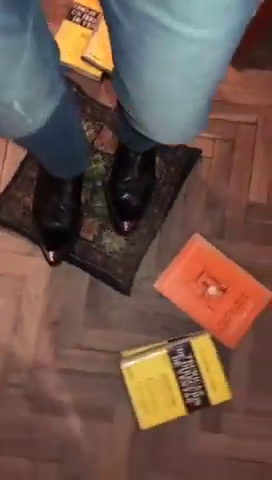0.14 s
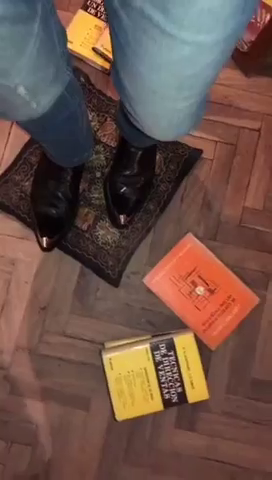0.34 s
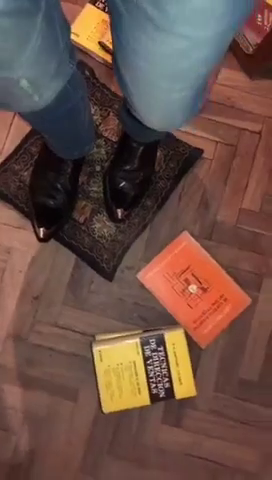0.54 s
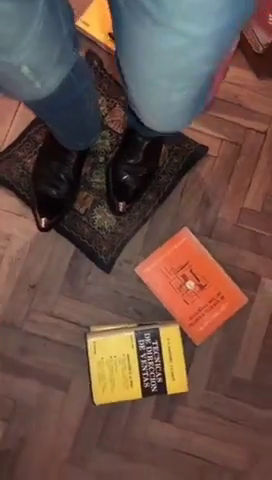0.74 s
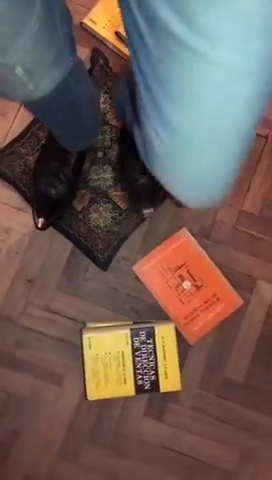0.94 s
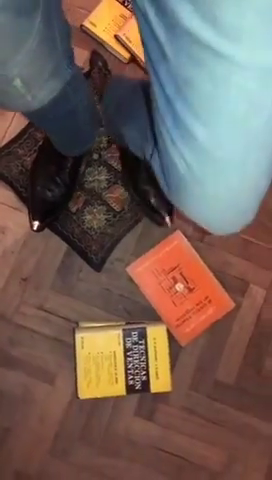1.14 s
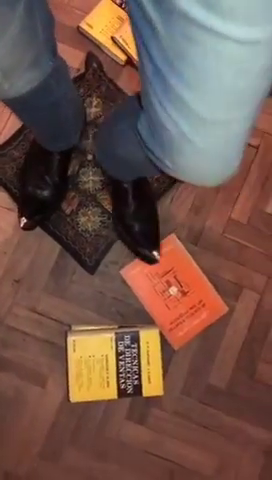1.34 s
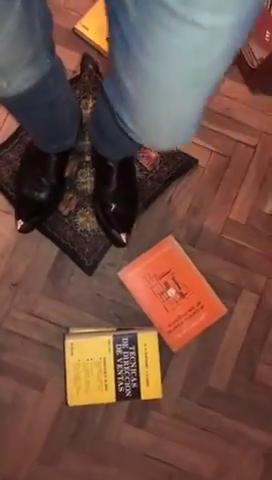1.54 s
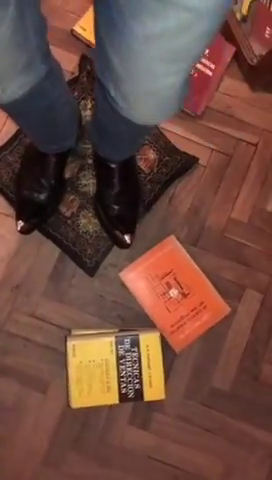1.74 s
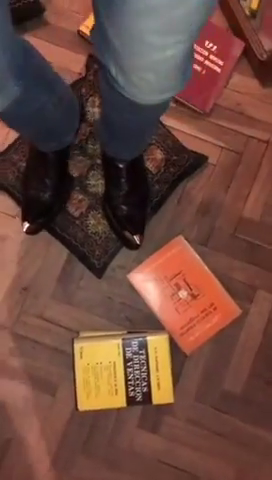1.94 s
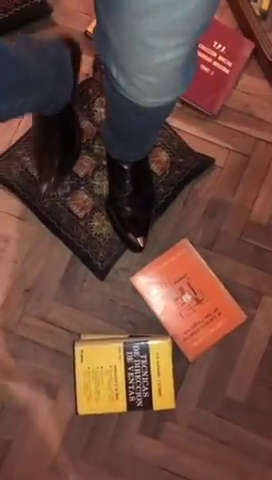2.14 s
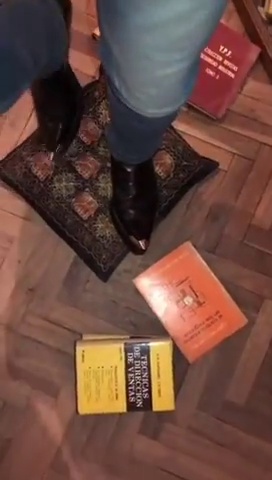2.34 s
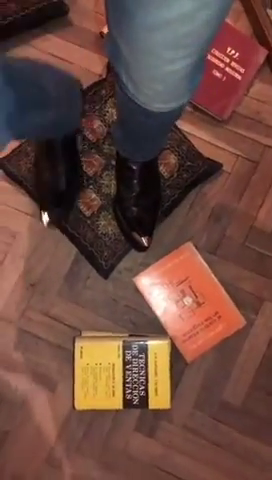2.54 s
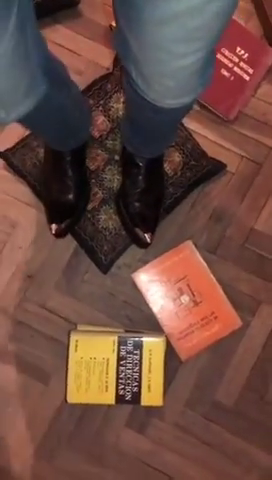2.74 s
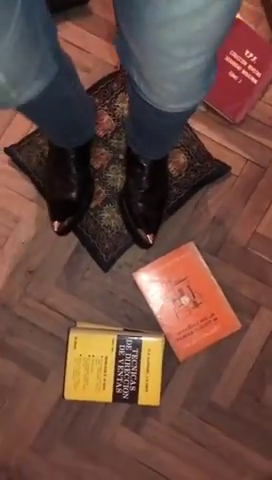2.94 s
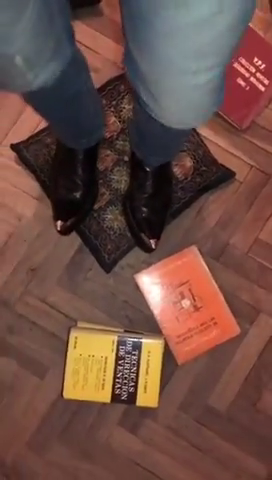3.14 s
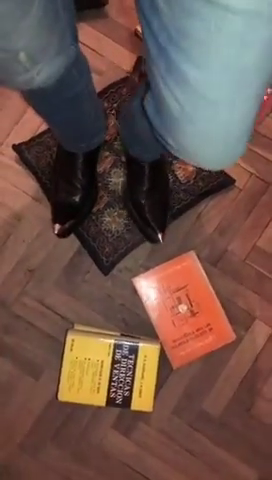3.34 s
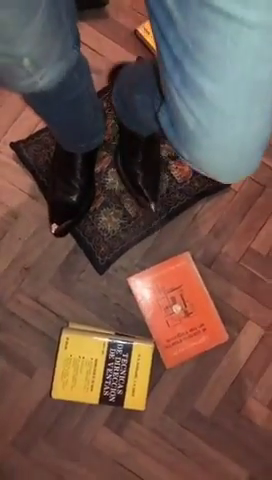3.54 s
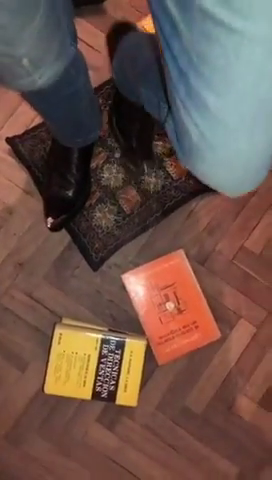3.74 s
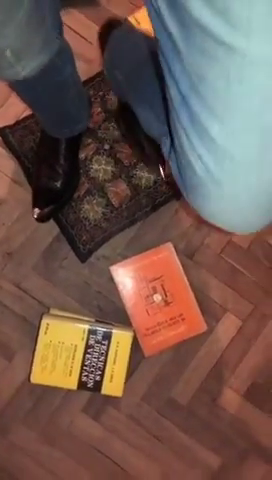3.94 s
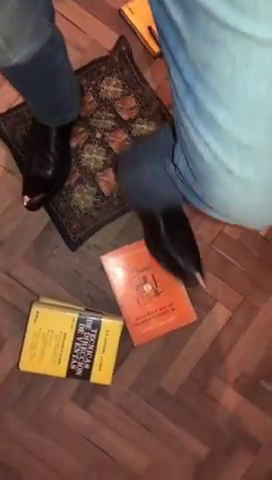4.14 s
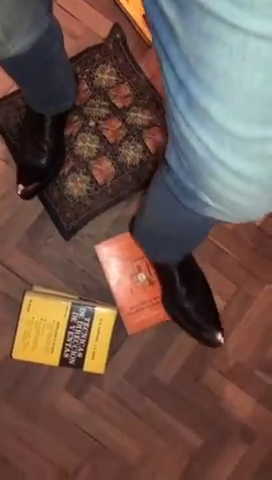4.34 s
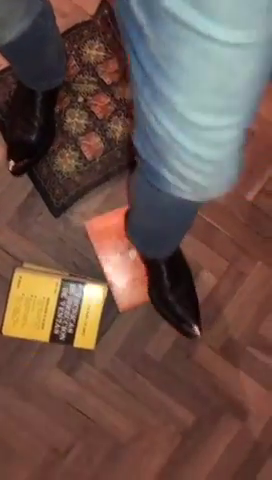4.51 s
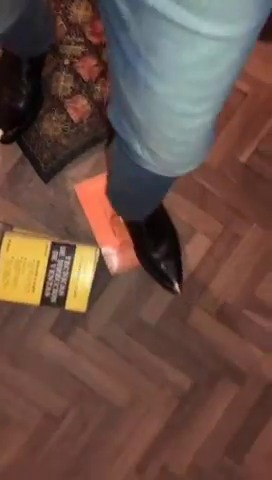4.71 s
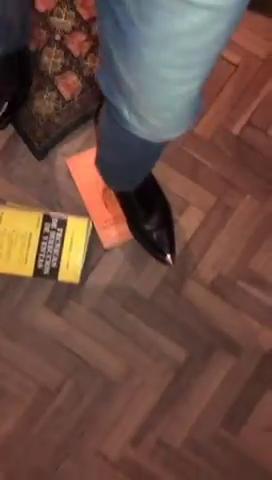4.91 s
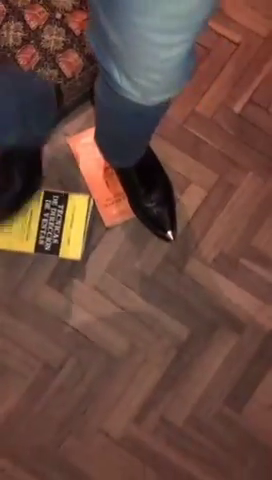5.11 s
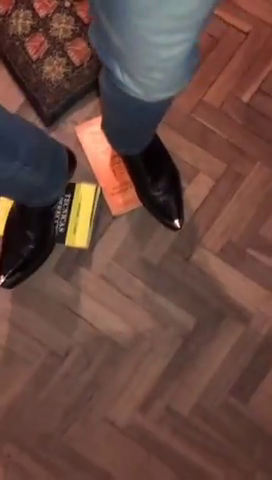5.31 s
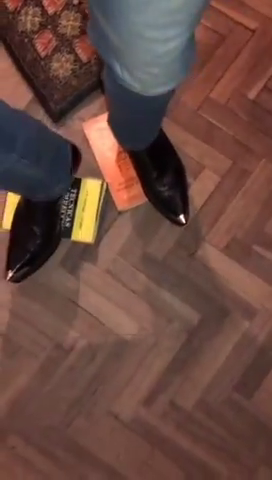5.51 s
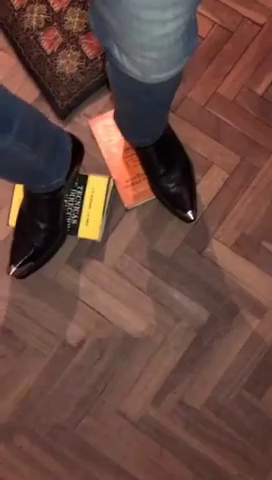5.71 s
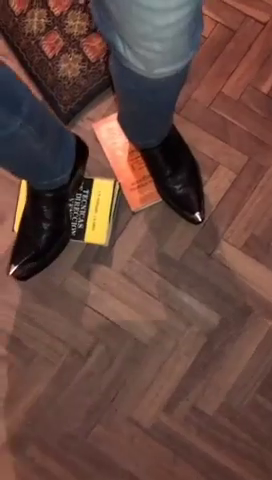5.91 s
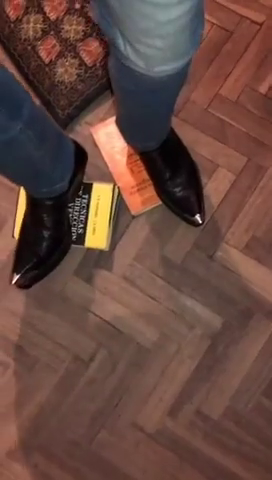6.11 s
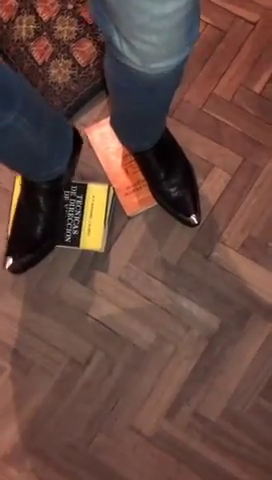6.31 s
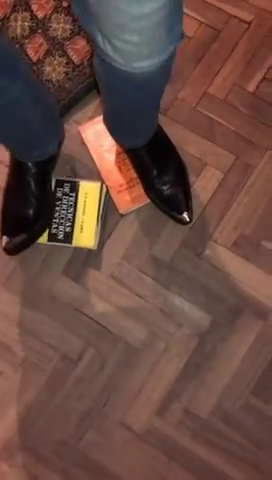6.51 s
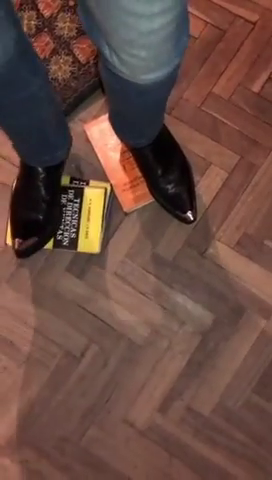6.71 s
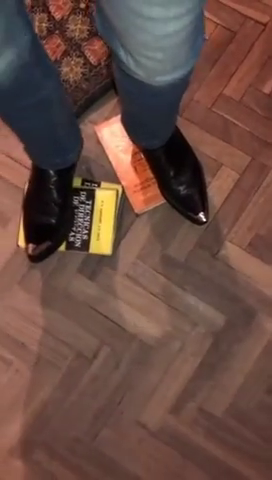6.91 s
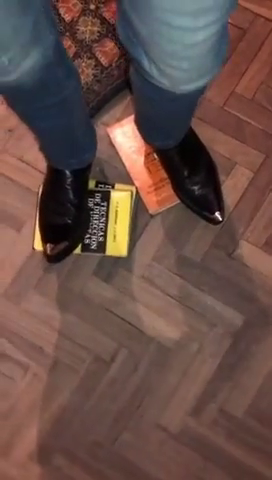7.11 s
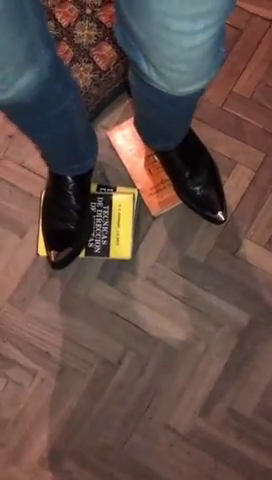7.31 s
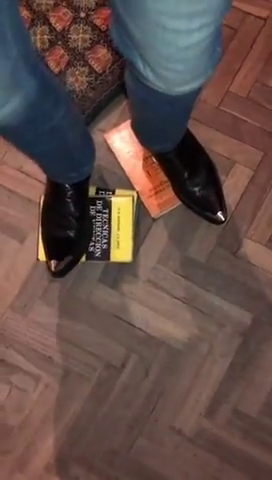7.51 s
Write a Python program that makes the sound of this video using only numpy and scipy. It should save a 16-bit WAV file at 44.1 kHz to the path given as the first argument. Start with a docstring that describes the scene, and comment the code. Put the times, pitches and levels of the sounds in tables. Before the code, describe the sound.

Close cloth swishes come and go as someone in hard-soled boots shifts on a cushion, with two or three soft heel bumps. Then a sharp knock as a boot steps on a book on parquet, a heavier double clack, and a last lighter knock with a gritty sole skid. Faint ticks and a small leather creak follow. Small lively room, quiet hum and hiss, handheld microphone above.

```python
"""Someone in hard-soled boots first shifts about on a cushion: filtered noise makes denim and embroidered
cloth swish at each move, and a heel gives soft bumps. Then come three knocks, as the boots step onto two books
on a parquet floor: decaying sine waves ring the boards in a small room, and noise bursts slap the covers.
After the second knock a sole skids with a gritty hiss, and near the end the leather creaks in quick slips.
Small ticks are scattered along the way; a faint hum, whine and hiss of air lie underneath throughout."""
import sys
import numpy as np
from scipy import signal
from scipy.fft import irfft, next_fast_len
from scipy.io import wavfile

SR = 44100
rng = np.random.default_rng(int(sys.argv[2]) if len(sys.argv) > 2 else 0)


def pcm_store(signal):
    """Save signal as 16-bit PCM."""
    levels = np.round(np.clip(np.atleast_2d(signal), -1, 1) * 32767)
    wavfile.write(sys.argv[1], SR, levels.astype(np.int16).T)


N = 337806
TIME = np.arange(N) / SR


def from_db(db):
    """Turn decibels into a gain."""
    return 10 ** (np.asarray(db) / 20)


def rms_one(x):
    """Scale to an average strength (rms) of 1."""
    return x / np.sqrt(np.mean(x ** 2) + 1e-20)


def at_hz(points, hz):
    """Read a table between its rows, on a log-frequency axis."""
    f, value = np.transpose(points)
    return np.interp(np.log(np.maximum(hz, 1)), np.log(f), value)


def noise(spectrum, size, tilt=0):
    """Noise with a given spectrum, tilted in dB per octave; rms 1."""
    hz = np.fft.rfftfreq(size, 1 / SR)
    lowest_hz = spectrum[0][0]
    octaves = np.log2(np.maximum(hz, lowest_hz))
    # below the first row of the table the noise fades out
    fade = np.minimum(hz / lowest_hz, 1) ** 2
    gain = from_db(at_hz(spectrum, hz) + tilt * octaves) * fade
    random_phase = np.exp(2j * np.pi * rng.random(len(hz)))
    return rms_one(irfft(gain * random_phase, size))


def long_noise(spectrum):
    """Noise with a given spectrum that lasts the whole scene."""
    return noise(spectrum, size=next_fast_len(N))[:N]


def band(x, low_hz, high_hz, order=2):
    """Keep only what lies between two frequencies (Butterworth band-pass)."""
    edges = [low_hz, min(high_hz, SR / 2 - 1)]
    return signal.sosfilt(signal.butter(order, edges, "band", fs=SR, output="sos"), x)


def resonance(x, hz, width):
    """Two-pole resonance, gain 1 on top."""
    r = np.exp(-np.pi * width / SR)
    feedback = [1, -2 * r * np.cos(2 * np.pi * hz / SR), r * r]
    return signal.lfilter(np.array([1, 0, -1]) * (1 - r * r) / 2, feedback, x)


def decay(t, t60):
    """Falls by 60 dB in t60 seconds."""
    return np.exp(-np.log(1000) * t / t60)


def add(out, s, sound):
    """Mix a sound in at time s."""
    start = round(s * SR)
    out[start:start + len(sound)] += sound[:N - start]


def ringing(modes, alternate=False):
    """One second of a body's answer to a unit blow; neighbouring modes may swing in opposite senses."""
    t, out = TIME[:SR], 0
    sense = -1 if alternate else 1
    for k, (hz, db, t60) in enumerate(modes):
        out = out + sense ** k * from_db(db) * decay(t, t60) * np.sin(2 * np.pi * hz * t)
    return out


def push(x, contact_ms):
    """A contact of finite length cannot excite modes much faster than itself."""
    r = np.exp(-2 * np.pi * 1000 / (contact_ms * SR))
    return signal.lfilter([(1 - r) ** 2], [1, -2 * r, r * r], x)


STROKE_RANGE_DB = 23  # rise and fall times span this much


def stroke(s, rise_s, hold_s, fall_s):
    """Gain of a rubbing stroke: it gathers speed, holds from time s, and dies away."""
    before = np.maximum(s - TIME, 0) / rise_s
    after = np.maximum(TIME - s - hold_s, 0) / fall_s
    return from_db(-STROKE_RANGE_DB * np.minimum(before + after, 10))


def catching(depth_db, rate_hz):
    """Rubbing surfaces catch and let go: a fast uneven gain of rms 1."""
    slow_pass = signal.butter(2, rate_hz, fs=SR, output="sos")
    wander = signal.sosfilt(slow_pass, rng.standard_normal(N))
    return rms_one(from_db(depth_db * rms_one(wander)))


# Deep swaying of the floor and the air above it. Each row: pitch in Hz, level in dB, time to fall 60 dB in s.
FLOOR_SWAY = [(62.15, -10, 0.51), (71.7, -2.5, 0.19), (86, -15.5, 0.59)]
# Book and boards; each step lands on another spot and reaches the modes differently.
# Each row: pitch in Hz, time to fall 60 dB in seconds, then level in dB at step 1, step 2 and step 3.
BOARDS = [(78, 0.22, -29, -11, -6.5), (117.2, 0.41, -13, -9, -19), (140.3, 0.46, -8.5, -14, -6.5),
          (171, 0.24, -21, -3.5, 4.5), (215, 0.25, -16, -3, -4.5), (286, 0.17, -0.5, 3, -11),
          (328, 0.22, -9, -2.5, -8), (403, 0.17, -1.5, -8, -2.5), (488, 0.14, -10, -5, -6),
          (565, 0.034, 0, -22, -7), (626, 0.082, -2, -4.5, -8.5), (695, 0.065, -3.5, 1.5, -10),
          (838, 0.038, -0.5, 1.5, -27), (917, 0.074, -2, 1.5, -4), (1025, 0.051, -21, 4, 3.5),
          (1038, 0.21, -20, -6, -27), (1115, .12, -29, -15, -9), (1340, 0.1, -31, -5.5, -7),
          (1530, 0.075, -30, -8.5, -3.5), (1930, 0.023, -22, -13, 0), (2720, 0.045, 9, -7, -23)]
# Colour of the flat slap of sole on cover. Each row: frequency in Hz, relative level in dB per Hz.
SLAP_COLOUR = [(120, -24), (250, 1), (450, -2.5), (800, -7), (1300, -10), (1900, -13), (2800, -14),
               (4500, -19), (8000, -24), (15500, -34)]
# Heel and sole meeting a book. Each row: start in seconds, thud level in dB, knock level in dB,
# contact time in ms, slap level in dB, slap tilt in dB per octave, time for the slap to fall 60 dB in seconds.
CONTACTS = [(4.6582, -39, -29, 1.3, -30.5, -2, 0.053), (4.6732, -42.5, -64, 2.3, -45, 0, 0.31),
            (4.7, -78, -69, 1.4, -59, 4.5, 0.15), (5.3034, -71, -40.5, 0.18, -29.5, 0, 0.059),
            (5.3085, -67, -34.5, 0.52, -27, -8, 0.041), (5.3136, -26, -29.5, 0.69, -35, 0.0, 0.18),
            (5.3227, -36, -42, 2, -42, -9, 0.077), (5.3267, -24, -39.5, 2.5, -39, -2.5, 0.046),
            (6.5982, -61, -40.5, 0.5, -41, 1.5, 0.015), (6.6066, -36.5, -47, 2, -42.5, -5.5, 0.055),
            (6.648, -32, -41, 1.05, -42, -1.5, 0.041)]
STEP_GAP_S = 0.3  # after a longer pause the next contact is a new step on a new spot


def footfalls(thud_contact_ms=1.6, crack_db=3.5, crack_t60=0.018, slap_rise_s=0.00075, lowest_hz=46):
    """Each contact slaps the cover, knocks the boards beneath and loads the whole floor."""
    out, t = np.zeros(N), TIME[:SR]
    thud = push(ringing(FLOOR_SWAY), thud_contact_ms)
    mode_hz, mode_t60, *spots = np.transpose(BOARDS)
    rows = np.array(CONTACTS)
    new_steps = np.flatnonzero(np.diff(rows[:, 0]) > STEP_GAP_S) + 1
    for contacts, spot_db in zip(np.split(rows, new_steps), spots):
        boards = ringing(zip(mode_hz, spot_db, mode_t60), alternate=True)
        for s, thud_db, knock_db, contact_ms, slap_db, tilt, t60 in contacts:
            knock = push(boards, contact_ms)
            add(out, s, from_db(thud_db) * thud + from_db(knock_db) * knock)
            # the hard edge cracks first, then the pages are pressed flat
            shape = decay(t, t60) + from_db(crack_db) * decay(t, crack_t60)
            shape = shape * (1 - np.exp(-t / slap_rise_s))
            slap = noise(SLAP_COLOUR, size=8192, tilt=tilt)
            add(out, s, from_db(slap_db) * slap * shape[:len(slap)])
    # the floor radiates little at the very bottom
    return signal.sosfilt(signal.butter(3, lowest_hz, "high", fs=SR, output="sos"), out)


# A heel set down on the cushion. Each row: start in seconds, level in dB.
PADS = [(2.088, -43.5), (2.239, -59), (3.812, -42.5)]


def pads(contact_ms=4.3):
    """Through the cushion a heel gives the boards only a long, soft push."""
    out = np.zeros(N)
    mode_hz, mode_t60, *spots = np.transpose(BOARDS)
    mean_db = np.mean(spots, axis=0)
    bump = push(ringing(zip(mode_hz, mean_db, mode_t60), alternate=True), contact_ms)
    for s, db in PADS:
        add(out, s, from_db(db) * bump)
    return out


def shifting(x, patchy_db, rate_hz, top_hz=4600, count=12):
    """Wrinkles form and flatten: each band of the swish swells and fades a little by itself."""
    edges, out = np.geomspace(480, top_hz, count + 1), 0
    for k, (low, high) in enumerate(zip(edges, edges[1:])):
        # alternating signs let neighbouring bands join without a notch
        out = out + (-1) ** k * band(x, low, high) * catching(patchy_db, rate_hz)
    return out


# Colour of rubbing cloth. Each row: frequency in Hz, relative level in dB per Hz.
CLOTH_COLOUR = [(90, -10), (140, 4.5), (205, -1.5), (275, 4.5), (420, -3.5), (760, -8.5), (1100, -7),
                (1600, -11), (2800, -11.5), (4200, -12), (6300, -12.5), (13000, -20), (15800, -23)]
# Cloth rubbing as a leg moves. Each row: time of full speed in seconds, rise, hold and fall in seconds,
# friction level in dB, rumble and fine hiss in dB relative to it, pitch of the fold in Hz, its relative level in dB.
RUBS = [(0.202, 0.17, 0.024, 0.085, -55.5, -4, -4, 525, 3),
        (0.959, 0.087, 0.026, 0.1, -55, -4.5, -4.5, 550, -6),
        (1.509, 0.088, 0.064, 0.077, -52, -2.5, -8, 1140, -9),
        (2.091, 0.092, 0.17, 0.053, -51, -7.5, -5.5, 1170, -2.5),
        (2.629, 0.018, 0.03, 0.044, -55, -4, -5, 880, 1),
        (2.719, 0.064, 0.013, 0.037, -62, -9, -4.5, 1100, -26),
        (3.369, 0.21, 0.097, 0.52, -54.5, -1.5, -6, 1110, -40),
        (3.761, 0.57, 0.046, 0.042, -56.5, -2, -2, 1120, 0),
        (4.176, 0.11, 0.13, .15, -84, -10, 5.5, 1250, -24),
        (4.981, 0.11, 0.0066, 0.034, -59, -6, -4.5, 1290, -20),
        (5.236, 0.58, 0.053, .05, -76.5, -9, 3, 1250, -33)]
# the leg sways faintly round each rub: relative level, and how many times slower it rises and falls
SWAY_DB, SWAY_STRETCH = -25, 5.1
DRAG_LAG_S = 0.015  # the rumble of pressed cloth trails the swish
FOLD_WIDTH = 0.34  # share of the fold's pitch


def cloth(rumble_db=0.0, swish_db=1.0, hiss_db=1.47):
    """Threads slide over each other; pressure adds a rumble, speed a fine hiss, a fold its hollow tone."""
    out, threads = np.zeros(N), long_noise(CLOTH_COLOUR)
    rumble = from_db(rumble_db) * rms_one(band(threads, 113, 520, order=4))
    rumble = rumble * catching(depth_db=1.5, rate_hz=11.4)
    grain = catching(depth_db=0.8, rate_hz=560)
    swish = shifting(long_noise(CLOTH_COLOUR), patchy_db=1.9, rate_hz=15.0) * grain
    hiss = from_db(hiss_db) * rms_one(band(threads, 4460, 17000, order=4)) * grain
    for s, rise, hold, fall, db, pressure_db, speed_db, hz, fold_db in RUBS:
        fold = from_db(fold_db) * resonance(swish, hz, FOLD_WIDTH * hz)
        coloured = from_db(swish_db) * rms_one(swish + fold)
        sway = from_db(SWAY_DB) * stroke(s, SWAY_STRETCH * rise, hold, SWAY_STRETCH * fall)
        speed = np.maximum(stroke(s, rise, hold, fall), sway)
        pressure = stroke(s + DRAG_LAG_S, rise, hold, fall)
        sliding = speed * (coloured + from_db(speed_db) * hiss)
        pressing = pressure * from_db(pressure_db) * rumble
        out += from_db(db) * (sliding + pressing)
    return out


# Colour of a slipping sole's hiss. Each row: frequency in Hz, relative level in dB per Hz.
SKID_COLOUR = [(300, 3), (1000, -3), (2500, -3.5), (4500, -6), (7000, -4), (10000, -12.5), (13000, -11.5),
               (16000, -22)]
# Sole slipping on a cover. Each row: time of full speed in seconds, rise, hold and fall in s, level in dB.
SKIDS = [(5.555, .03, .005, .04, -67.5), (5.635, 0.056, .005, 0.05, -61.5),
         (6.627, 0.028, 0.01, 0.093, -44), (7.603, .06, .05, .06, -71)]


def skid(grit_db=2.0):
    """The sole slips on a glossy cover with a gritty hiss."""
    level = sum(from_db(db) * stroke(s, rise, hold, fall) for s, rise, hold, fall, db in SKIDS)
    return level * long_noise(SKID_COLOUR) * catching(depth_db=grit_db, rate_hz=500)


# Leather creaking as the weight comes onto it. Each row: time of full level in seconds, hold in seconds,
# level in dB, slips per second at first, slips per second at last.
CREAKS = [(7.151, 0.045, -67, 1000, 690), (7.213, 0.036, -61.5, 540, 440)]
# Resonances of the boot. Each row: pitch in Hz, width in Hz, relative level in dB.
LEATHER = [(715, 94, 1), (1000, 250, -10), (1550, 400, -9.5), (2510, 170, -5.5), (2960, 250, -6),
           (3440, 360, -10.5), (4030, 360, -12)]
CREAK_RISE_S, CREAK_FALL_S, CREAK_SLOWING_S = 0.026, 0.031, 0.016
CREAK_JITTER_DB, CREAK_JITTER_HZ = 0.55, 90  # depth and speed of the unevenness in the slip rate


def creak():
    """Leather sticks and slips, ever more slowly and a little unevenly, and rings the boot."""
    out = np.zeros(N)
    for s, hold, db, first_per_s, last_per_s in CREAKS:
        slowing = np.exp(-np.maximum(TIME - s, 0) / CREAK_SLOWING_S)
        per_s = last_per_s + (first_per_s - last_per_s) * slowing
        turns = np.cumsum(per_s * catching(CREAK_JITTER_DB, CREAK_JITTER_HZ)) / SR
        # one click of random strength at each whole turn
        slips = np.diff(np.floor(turns), prepend=0) * rng.uniform(.6, 1, N)
        body = np.zeros(N)
        for k, (hz, width, mode_db) in enumerate(LEATHER):
            body += (-1) ** k * from_db(mode_db) * resonance(slips, hz, width)
        out += from_db(db) * stroke(s, CREAK_RISE_S, hold, CREAK_FALL_S) * rms_one(body)
    return out


# Small ticks of leather and binding.
# Each row: start in seconds, level in dB, centre pitch in Hz, time to fall 60 dB in seconds.
TICKS = [(2.794, -65, 1260, 0.055), (2.932, -64.5, 1140, 0.11), (3.016, -63, 1140, 0.097),
         (3.176, -67, 1500, 0.043), (5.505, -53.5, 3200, 0.021), (5.641, -52.5, 1770, 0.037),
         (6.202, -62, 2470, 0.035), (6.27, -58.5, 6000, 0.047), (7.04, -60, 514, 0.058),
         (7.088, -62, 1470, 0.042), (7.446, -64, 1070, 0.056)]


def ticks(rise_s=0.0017):
    """Short, broad crackles as the weight settles: widely resonant noise that dies away at once."""
    out, t = np.zeros(N), TIME[:SR // 4]
    for s, db, hz, t60 in TICKS:
        crackle = rms_one(resonance(rng.standard_normal(len(t)), hz, hz * 0.63))
        add(out, s, from_db(db) * crackle * decay(t, t60) * (1 - np.exp(-t / rise_s)))
    return out


# How long echoes last. Each row: frequency in Hz, time to fall 60 dB in seconds.
ROOM_T60 = [(100, 0.8), (400, 0.37), (1500, 0.49), (4000, 0.62), (9000, 0.33), (16000, 0.42)]
# How strongly the room answers. Each row: frequency in Hz, relative level in dB.
ROOM_SEND = [(60, -4.5), (200, -1.5), (500, 1), (1500, -4), (5000, -5), (15000, -2)]


def room(x, first_echo_s=0.0033, build_s=0.0085):
    """Dense wall echoes, made of noise that dies away at its own pace in each octave."""
    t, response = TIME[:SR], 0
    onset = 1 - np.exp(-np.maximum(t - first_echo_s, 0) / build_s)
    for hz in 88 * 2. ** np.arange(8):
        tail = rng.standard_normal(SR) * onset * decay(t, at_hz(ROOM_T60, hz))
        tail = tail / np.linalg.norm(tail)
        octave = band(tail, hz / np.sqrt(2), hz * np.sqrt(2), order=3)
        response = response + from_db(at_hz(ROOM_SEND, hz)) * octave
    return signal.fftconvolve(x, response)[:N]


# Colour of the still air. Each row: frequency in Hz, relative level in dB per Hz.
AIR_COLOUR = [(20, -31), (37, -1.5), (59, -2), (97, -10), (151, -6), (228, -11.5), (418, -18), (705, -23),
              (928, -22), (1010, -23), (1900, -26), (2950, -28), (4840, -29), (12700, -34), (15800, -35)]
AIR_DB = -66  # rms
# A thin electronic whine. Each row: pitch in Hz, level in dB rms.
WHINE = [(3025, -91.5), (4037, -90.5), (5044, -91), (6056, -92), (7063, -93), (9082, -95), (11100, -99)]
HUM_HZ = 56
HUM_DB, HUM_GROWTH_DB_PER_S = -79.5, 1.5  # rms at the start before the swell is added, and slow growth
HUM_SWELL_DB, HUM_PERIOD_S, HUM_CREST_S = 5.5, 3.7, 2.25  # up and down by this much, period, time of a crest


def background():
    """Still air as noise, a deep sine hum that slowly swells and fades, and a thin whine of sines."""
    whine = sum(from_db(db) * np.sin(2 * np.pi * (hz * TIME + rng.random())) for hz, db in WHINE)
    swell_db = HUM_SWELL_DB * np.cos(2 * np.pi * (TIME - HUM_CREST_S) / HUM_PERIOD_S)
    hum_db = HUM_DB + HUM_GROWTH_DB_PER_S * TIME + swell_db
    hum = from_db(hum_db) * np.sin(2 * np.pi * HUM_HZ * TIME)
    air = from_db(AIR_DB) * long_noise(AIR_COLOUR)
    return air + np.sqrt(2) * (hum + whine)  # a sine of rms 1 peaks at the root of 2


def scene(boots_wet_db=-8.0, cloth_wet_db=-6.5):
    """The boots are down on the floor, the cloth is nearer; both also sound through the room."""
    boots = footfalls() + pads() + skid() + ticks() + creak()
    near = cloth()
    echoes = room(from_db(boots_wet_db) * boots + from_db(cloth_wet_db) * near)
    return (boots + near + echoes + background())[None]


# Resonances of the microphone port. Each row: pitch in Hz, width in Hz, boost or cut in dB.
PORT = [(3780, 1100, -1), (4990, 760, -3.5), (6400, 980, 0), (7600, 960, -3.5), (10500, 770, -5),
        (12400, 2600, 2)]
CUTOFF_HZ = 15900


def record(dry):
    """The microphone port ripples the treble; the top is cut."""
    for hz, width, db in PORT:
        dry = dry + (from_db(db) - 1) * resonance(dry, hz, width)
    return signal.sosfilt(signal.ellip(12, .1, 80, CUTOFF_HZ, fs=SR, output="sos"), dry)


dry = scene()
out = record(dry)
pcm_store(out)
```